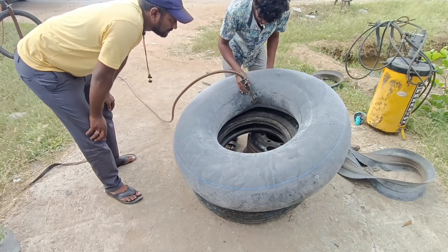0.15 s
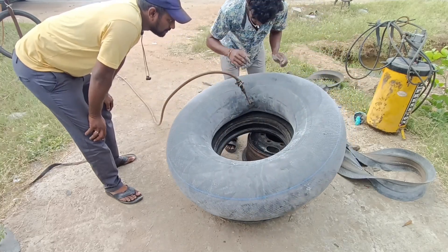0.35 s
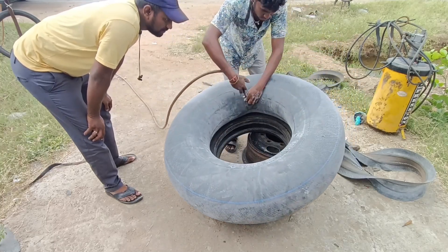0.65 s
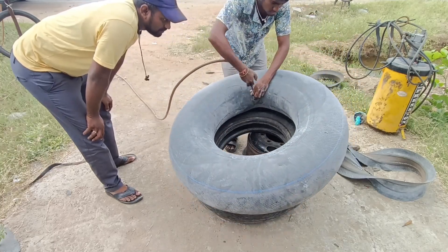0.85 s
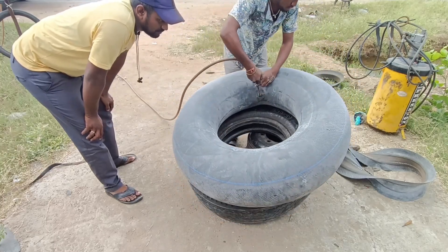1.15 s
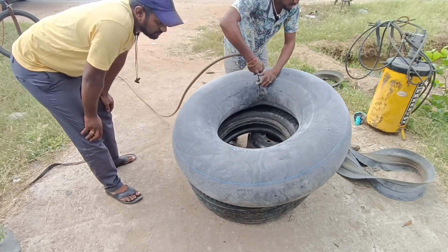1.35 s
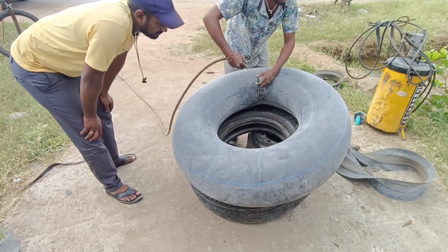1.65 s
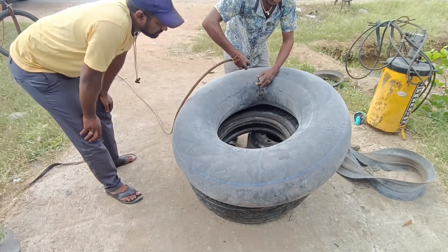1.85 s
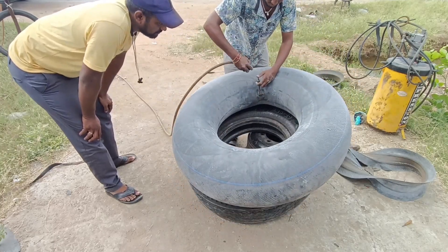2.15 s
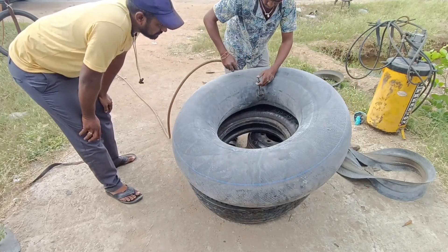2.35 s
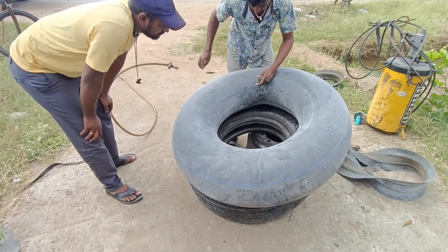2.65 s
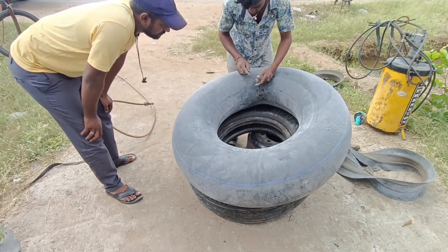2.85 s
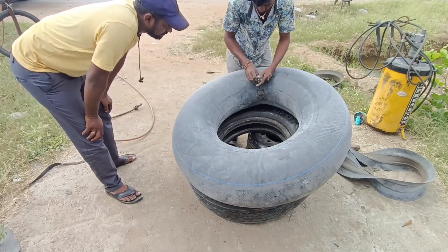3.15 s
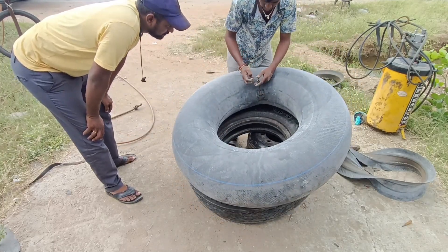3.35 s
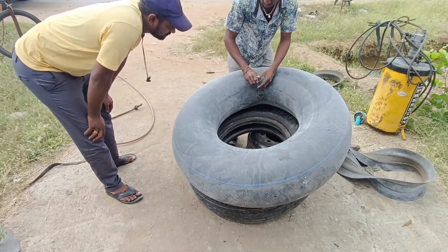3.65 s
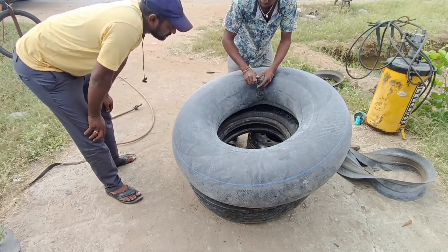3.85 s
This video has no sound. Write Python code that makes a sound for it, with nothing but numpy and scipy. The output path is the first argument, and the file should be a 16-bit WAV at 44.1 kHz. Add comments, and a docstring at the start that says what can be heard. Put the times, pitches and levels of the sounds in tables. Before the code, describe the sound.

Loud compressed air hisses from a tyre tube valve, bright and steady with faint brief whistles, over low road rumble. Light puffs come near 1.4 seconds; at 1.6 a heavy gust buffets the stereo microphone, then uneven hissing continues until it shuts off at 2.1 with a short outdoor echo. Near-quiet follows. At 3.2 a small steel part clinks and bounces faintly while a distant engine swells to the end.

```python
"""Air jet from a tyre valve, with passing engine and falling steel

Compressed air hisses, rushes and whistles from a hose chuck at a tyre tube valve: shaped, patchy noise.
The chuck is pulled off; the jet sweeps over two microphone ports as noise blasts and damped swings.
The valve then shuts and a brief yard echo fades. An engine, summed from harmonic orders, dips and then
swells over road noise and a steady motor; far squeaks and a constant faint hiss lie beneath.
A small steel part drops, clinks and bounces: decaying modes and noise at each contact."""
import sys
import numpy as np
from scipy import signal
from scipy.fft import rfft, irfft, next_fast_len
from scipy.io import wavfile
from scipy.ndimage import uniform_filter1d, map_coordinates

SR = 44100
rng = np.random.default_rng(int(sys.argv[2]) if len(sys.argv) > 2 else 0)


def generate_wav(sig):
    """Save sig (samples, or channels by samples) to the path in sys.argv[1] as 16-bit PCM at SR."""
    pcm = np.round(np.clip(np.atleast_2d(sig).T, -1, 1) * 32767).astype(np.int16)
    wavfile.write(sys.argv[1], SR, pcm)


N = 176400
T = np.arange(N) / SR

# Escaping air over time: time_s, hiss_db, left_minus_right_db, low_rush_db
JET_LEVELS = [(0, -31, -2, -40), (.14, -30.5, -2, -40), (.8, -30, -2, -41), (1.3, -30.5, -2.5, -40),
              (1.58, -29.5, -2.5, -41), (1.61, -22.5, 1, -31.5), (1.7, -28.5, -3, -29.5),
              (1.755, -33.5, -4.5, -41.5), (1.77, -30.5, -4.5, -46.5), (1.92, -28, -5, -45),
              (1.96, -27.5, -2.5, -45), (2.0, -27.5, -4.5, -44.5), (2.04, -31, -2.5, -43),
              (2.07, -28.5, -4, -39), (2.115, -33.5, -2.5, -46.5)]
# Spectral density of the jet above the edge: frequency_hz, density_db_per_hz
HISS_SPECTRUM = [(1530, -36), (2600, -6), (2800, -7.5), (3480, -4), (3770, -1), (4410, 0.5), (5470, -9),
                 (6590, -6.5), (7150, -9), (8810, -10), (11500, -18.5), (12900, -13.5), (13600, -13.5),
                 (14600, -21), (15400, -17)]
# Spectral density of the jet below the edge: frequency_hz, density_db_per_hz
RUSH_SPECTRUM = [(88, -41.5), (150, -5.5), (212, -12.5), (344, 0.5), (406, -2.5), (479, -3.5), (533, -14),
                 (622, -11.5), (837, -19), (1100, -6.5), (1190, -5.5), (1510, -10.5), (1770, -5),
                 (2240, -3), (2550, 0.5), (3320, -26.5), (5610, -120)]
# Likeness of the jet at the two ports: frequency_hz, correlation
JET_ALIKE = [(300, 1), (1400, 1), (2500, 1), (4000, 0.39), (8000, 0.069), (11000, .1)]
# Gain of the hiss above 9.5 kHz: time_s, gain_db
TREBLE_GAIN = [(0, -0.5), (1.55, 0.5), (1.62, -2.5), (1.72, 3), (1.8, 1.5), (1.95, .5), (2.03, 1.5),
               (2.115, 0.5)]
# Shift of the low rush to the left as the jet turns away: time_s, shift_db
RUSH_LEFT = [(1.75, 0), (1.78, 6.5), (2.1, 3.5)]
# Momentary whistles of the leak: middle_s, length_s (between points 3.4 dB down),
# pitch_hz, width_hz, level_db
WHISTLES = [(.07, 0.083, 4200, 60, -55), (.19, 0.062, 3720, 60, -37.5), (.36, 0.19, 3820, 50, -42),
            (.37, 0.1, 2420, 30, -42), (.47, .04, 2524, 28, -37.5), (.6, 0.09, 2500, 20, -54),
            (.45, 0.25, 4500, 50, -55), (.76, 0.1, 2458, 12, -42.5), (.92, 0.12, 2474, 24, -41.5),
            (.82, 0.21, 3940, 23, -38.5), (1.1, 0.15, 4450, 40, -41), (1.33, 0.091, 4520, 21, -38.5),
            (1.965, 0.043, 4584, 100, -31), (2.085, 0.067, 4876, 420, -37)]
EDGE_HZ = 2580  # a sharp edge in the spectrum; the sound above and below it is levelled separately
JET_LAG_S = 9e-5  # left port hears the jet later
SHUT_S, SHUT_T60_S = 2.119, 0.099  # closing of the valve
YARD_DB, YARD_T60_S = -12, 0.22  # the yard's echo of the jet
ECHOES, ECHO_SPAN_S, ECHO_DB = 6, .018, -13  # off tube, tyre and ground

# Road noise over time: time_s, level_db
ROAD_LEVELS = [(0, -48), (1.55, -42.5), (1.8, -46.5), (2.2, -58), (2.5, -57), (2.8, -56), (3.2, -49),
               (3.6, -47), (4, -44.5)]
# Spectral density of road noise: frequency_hz, density_db_per_hz
ROAD_SPECTRUM = [(25, -25.5), (60, -14), (110, -6.5), (150, -16), (232, -20.5), (372, -21.5), (540, -28.5),
                 (700, -32.5), (1000, -32), (1900, -38), (2450, -36.5), (2900, -44), (3700, -41),
                 (5700, -54), (10000, -63.5), (15400, -81)]
# Likeness of far sound at the two ports: frequency_hz, correlation
ROAD_ALIKE = [(60, 0.3), (400, 0.74), (1000, .6), (3000, 0.15), (8000, 0.27)]
# Engine over time: time_s, fourth_order_db, fifth_order_db, other_orders_db
ENGINE_LEVELS = [(0, -54, -65, -59.5), (1.5, -52.5, -60, -55), (1.8, -64, -64, -55), (2.2, -62, -60.5, -63),
                 (2.6, -62, -57, -77.5), (3, -55, -56.5, -62), (3.25, -49, -50.5, -60.5),
                 (3.5, -46.5, -45, -60.5), (3.7, -45, -39.5, -54.5), (3.85, -48, -37.5, -58.5),
                 (4, -46, -36.5, -54.5)]
# Other engine orders, relative to their common level: order, level_db
ENGINE_ORDERS = [(3, -3), (6, -10), (7, -5.5), (8, -3.5), (9, -5.5)]
# Steady motor over time: time_s, low_orders_db, order_16_db
MOTOR_LEVELS = [(0, -64, -71.5), (2.2, -78.5, -92.5), (2.6, -81, -80), (3, -72.5, -80.5), (3.3, -72, -85),
                (3.7, -64.5, -77.5), (4, -57, -75.5)]
# Motor orders, relative to those levels, order 16 first: order, level_db
MOTOR_ORDERS = [(16, 3.5), (5, -0.5), (6, 1.5), (7, -5.5), (8, -0.5), (11, -5.5)]
# Faint far squeaks: middle_s, length_s (between points 3.4 dB down), pitch_hz, width_hz, level_db
SQUEAKS = [(3.74, .08, 2070, 120, -70), (3.79, 0.055, 1990, 79, -67)]
ROAD_LAG_S = -3.5e-4  # negative: right port hears the road later
ENGINE_CYCLE_HZ, MOTOR_HZ = 20.0, 48.44  # rate of order 1

# Spectral density of the steady far hiss outdoors: frequency_hz, density_db_per_hz
AIR_SPECTRUM = [(1000, -31), (2000, -7.5), (2450, 1), (3000, -3.5), (5000, -11), (9000, -19),
                (15500, -32.5)]
AIR_LEVEL_DB = -80.5

# The jet blowing on the ports: start_s, hold_s, left_db, right_db, tilt_db_per_octave
BLASTS = [(1.384, 0.027, -41.5, -31, -13), (1.488, 0.041, -29.5, -48, -13), (1.598, 0.02, -41, -15.5, -4.5),
          (1.612, 0.043, -18.5, -16.5, -1.7), (1.657, 0.047, -20, -19, 0), (1.703, 0.018, -27.5, -22, 5.5),
          (1.721, 0.036, -33, -29.5, 5.5), (1.748, 0.004, -33, -24, 7.5),
          (1.754, 0.022, -39.5, -38.5, -8.5), (1.783, 0.022, -33.5, -53, 7),
          (1.836, 0.022, -38.5, -43, -3.5), (1.88, 0.014, -34, -44.5, 2.5), (1.929, 0.0077, -35, -33, 3.5),
          (2.053, 0.031, -63, -27, -4), (2.05, 0.0035, -52, -26.5, 3), (2.093, 0.025, -60, -41.5, -2)]
# Spectral density of that turbulence before tilt: frequency_hz, density_db_per_hz
PORT_SPECTRUM = [(25, -34.5), (60, -22), (110, -9.5), (286, -3), (543, -12.5), (712, -9.5), (1650, -14.5),
                 (2900, -16), (3800, -13), (5500, -29.5), (9000, -39.5), (12000, -62)]
BLAST_RISE_S, BLAST_T60_S = 0.003, 0.057

# Single pushes of air on the ports: start_s, pitch_hz, left_db, right_db
THUMPS = [(1.602, 130, -24.5, -9.5), (1.615, 253, -16, -13.5), (1.635, 218, -13.5, -13.5),
          (1.674, 260, -18, -17), (1.695, 245, -19, -20), (1.905, 129.6, -29.5, -41.5),
          (1.934, 140.7, -23.5, -35.5), (2.059, 150, -43, -13.5), (2.071, 231, -45, -17),
          (2.094, 130, -47, -24.5)]
THUMP_CYCLES = 3.5  # cycles to lose 30 dB

# Contacts of the steel part: start_s, level_db, thud_db (relative), thud_tilt_db_per_octave
CLINKS = [(3.1936, -36, -2, 1), (3.212, -56, 8.5, -3.5), (3.224, -51, -16, 0), (3.277, -60, -25, -2),
          (3.366, -66.5, -16, -2), (3.394, -71, -20, 5)]
# Modes of the steel part: frequency_hz, level_db, t60_s
STEEL_MODES = [(8742, -16, .035), (9913, -3, .26), (9960, -10, .22), (10570, -14, .04), (12730, -18, .025)]
# Modes of what it lands on: frequency_hz, level_db, t60_s
THUD_MODES = [(290, -1, 0.038), (490, -6, 0.022), (880, 3, 0.04), (1000, 2, 0.032), (1600, 7, 0.018),
              (1790, 3, 0.018), (3020, -1, .015), (3900, 0, .035), (4800, -5, 0.025)]
# Spectral density of crack and scatter: frequency_hz, density_db_per_hz
SCATTER_SPECTRUM = [(300, -29), (1000, -4), (4000, 1.5), (7000, -17.5), (10000, 12), (13000, -17),
                    (15500, -13)]
CLINK_LAG = 6  # samples by which the right port hears it later

LOW_CUT_HZ, TOP_HZ = 36, 15547  # limits of the microphone band


def amp(db):
    """Logarithmic level: decibels to amplitude gain."""
    return 10 ** (np.asarray(db) / 20)


def unit(x):
    """Normalization: scale to an rms of 1."""
    return x / np.sqrt(np.mean(x ** 2) + 1e-20)


def along(points, hz):
    """Logarithmic pitch scale: interpolate (frequency, value) points along it."""
    f, v = np.transpose(points)
    return np.interp(np.log(hz + 1), np.log(f + 1), v)


def curves(rows):
    """Slow modulation: one value per sample for each column after the time."""
    s, *columns = np.transpose(rows)
    return [np.interp(T, s, column) for column in columns]


def wobble(rate):
    """Random modulation: a smooth curve through rate random knots a second."""
    knots = rng.standard_normal(int(N * rate / SR) + 4)
    return map_coordinates(knots, [T * rate])


def filtered(x, response):
    """Linear filtering: multiply the spectrum by a response of frequency."""
    m = next_fast_len(x.shape[-1] + 8192)
    hz = np.fft.rfftfreq(m, 1 / SR)
    return irfft(rfft(x, m) * response(hz), m)[..., :x.shape[-1]]


def balance(left_minus_right_db):
    """Interaural-style level difference: gains of the left and right ports."""
    return amp(np.outer([.5, -.5], left_minus_right_db))


def patchy_noise(spectrum, alike, patchy_db, lag_s=0):
    """Partly coherent turbulence: stereo noise of rms 1 with narrow streaks of random gain."""
    z = signal.stft(rng.standard_normal((2, N)), nperseg=1024)[2]
    field = uniform_filter1d(rng.standard_normal(z.shape[1:]), size=2, axis=0)
    field = uniform_filter1d(field, size=10, axis=1)
    pair = signal.istft(z * amp(patchy_db * unit(field)), nperseg=1024)[1][:, :N]

    def mid_side(hz):
        # half the angle whose cosine is the left-right correlation
        turn = np.arccos(np.clip(along(alike, hz), -1, 1)) / 2
        return amp(along(spectrum, hz)) * [np.cos(turn), np.sin(turn)]

    mid, side = filtered(pair, mid_side)
    ports = np.array([mid + side, mid - side])
    # half the lag on each port, in opposite directions
    return unit(filtered(ports, lambda hz: np.exp(np.outer([-1j, 1j], np.pi * hz * lag_s))))


def early_echoes(x):
    """Comb filtering: weak early copies, different at each port, interfere with the direct sound."""
    lag_s = rng.uniform(.002, ECHO_SPAN_S, (2, ECHOES, 1))
    sign = rng.choice([-1, 1], (2, ECHOES, 1))

    def comb(hz):
        copies = (sign * np.exp(-2j * np.pi * hz * lag_s)).sum(axis=1)
        return (1 + amp(ECHO_DB) * copies) / np.sqrt(1 + ECHOES * amp(2 * ECHO_DB))

    return filtered(x, comb)


def valve():
    """Exponential decay: the jet is shut off, then the weaker, slower yard echo remains."""
    after = np.maximum(T - SHUT_S, 0)
    return np.maximum(amp(-60 * after / SHUT_T60_S), amp(YARD_DB - 60 * after / YARD_T60_S))


def jet():
    """Jet turbulence: broadband hiss and low rush, joined by whistles and cut by the valve."""
    hiss_db, pan_db, low_db = curves(JET_LEVELS)
    treble_db, = curves(TREBLE_GAIN)
    left_db, = curves(RUSH_LEFT)

    hiss = patchy_noise(HISS_SPECTRUM, JET_ALIKE, patchy_db=1.8, lag_s=JET_LAG_S)
    hiss = filtered(hiss, lambda hz: hz >= EDGE_HZ)
    treble = filtered(hiss, lambda hz: hz > 9500)
    hiss = hiss + (amp(treble_db) - 1) * treble

    low = patchy_noise(RUSH_SPECTRUM, JET_ALIKE, patchy_db=3.5, lag_s=JET_LAG_S)
    low = filtered(low, lambda hz: hz < EDGE_HZ) * balance(left_db)

    hiss = amp(hiss_db + 0.72 * wobble(13.27)) * hiss
    low = amp(low_db + 0.37 * wobble(13)) * low
    air = early_echoes(hiss + low) + whistles(WHISTLES)
    return air * valve() * balance(pan_db)


def whistles(rows):
    """Narrow-band noise: each random tone swells and fades under half a cosine."""
    out = np.zeros((2, N))
    for middle_s, length_s, pitch_hz, width_hz, db in rows:
        shared, left, right = rng.standard_normal((3, N))
        ports = np.array([shared + 1.4 * left, shared + 0.61 * right])
        band = unit(filtered(ports, lambda hz: np.exp(-((hz - pitch_hz) / width_hz) ** 2)))
        swell = np.cos(np.pi * np.clip((T - middle_s) / length_s / 1.9, -.5, .5))
        out += amp(db) * swell * band
    return out


def road():
    """Rolling noise: broadband sound of slowly changing level, partly coherent at the ports."""
    level_db, = curves(ROAD_LEVELS)
    noise = patchy_noise(ROAD_SPECTRUM, ROAD_ALIKE, patchy_db=-0.5, lag_s=ROAD_LAG_S)
    return amp(level_db) * amp(0.94 * wobble(13)) * noise


def orders(rate_hz, rows, unsteady_db):
    """Rotational harmonics: sines at multiples of an unsteady rate, each wavering in level."""
    turns = 2 * np.pi * np.cumsum(rate_hz * (1 + .005 * wobble(9))) / SR
    tones = []
    for order, db in rows:
        level = np.sqrt(2) * amp(db + unsteady_db * wobble(14))
        tones.append(level * np.sin(round(order) * turns + rng.uniform(0, 2 * np.pi)))
    return tones


def engine():
    """Harmonic drone: orders of the engine cycle, with the fourth and fifth swelling separately."""
    fourth_db, fifth_db, rest_db = curves(ENGINE_LEVELS)
    rows = [(4, 0.019), (5, 0.002)] + ENGINE_ORDERS
    fourth, fifth, *rest = orders(ENGINE_CYCLE_HZ, rows, unsteady_db=-0.34)
    drone = amp(fourth_db) * fourth + amp(fifth_db) * fifth + amp(rest_db) * sum(rest)
    return drone * amp([[-.2], [.2]])


def motor():
    """Rotational harmonics at a steady mean rate: low orders and order 16 vary separately in level."""
    low_db, high_db = curves(MOTOR_LEVELS)
    high, *low = orders(MOTOR_HZ, MOTOR_ORDERS, unsteady_db=4)
    return amp(low_db) * sum(low) + amp(high_db) * high


def far_air():
    """Stationary noise: a faint outdoor hiss of constant level."""
    return amp(AIR_LEVEL_DB) * patchy_noise(AIR_SPECTRUM, ROAD_ALIKE, patchy_db=1.2)


def blasts():
    """Local flow noise: lumpy turbulence, unrelated at the two ports, when the jet points at them."""
    out, n = np.zeros((2, N)), SR // 4
    t = T[:n]
    for start_s, hold_s, left_db, right_db, tilt_db in BLASTS:
        knots = rng.standard_normal((2, 64))
        lumps = amp(3.6 * map_coordinates(knots, [[[0] * n, [1] * n], [t * 170] * 2]))

        def tilted(hz):
            return amp(along(PORT_SPECTRUM, hz) + tilt_db * np.log2((hz + 20) / 250))

        noise = unit(filtered(rng.standard_normal((2, n)), tilted)) * lumps
        shape = np.minimum(t / BLAST_RISE_S, 1) * amp(-60 * np.maximum(t - hold_s, 0) / BLAST_T60_S)
        burst = shape * noise
        # equal energy at each port before its level is set
        burst *= np.linalg.norm(shape) / np.linalg.norm(burst, axis=1, keepdims=True)
        start = round(start_s * SR)
        out[:, start:start + n] += amp([[left_db], [right_db]]) * burst
    return out


def thumps():
    """Damped oscillation: each push swings the air in the port for a few cycles."""
    out, t = np.zeros((2, N)), T[:SR // 8]
    for start_s, pitch_hz, left_db, right_db in THUMPS:
        rise = np.minimum(t * pitch_hz * 2, 1)
        decay = amp(-30 * t * pitch_hz / THUMP_CYCLES)
        swing = np.sin(2 * np.pi * pitch_hz * t) * rise * decay * rng.choice([-1, 1])
        out[:, round(start_s * SR):][:, :len(t)] += amp([[left_db], [right_db]]) * swing
    return out


def ring(modes, t, tilt_db=0):
    """Modal vibration: sum decaying sines whose levels vary at random from contact to contact."""
    total = np.zeros(len(t))
    for hz, level_db, t60_s in modes:
        struck_db = level_db + tilt_db * np.log2(hz / 900) + rng.normal(0, 1.2)
        total += amp(struck_db - 60 * t / t60_s) * np.sin(2 * np.pi * hz * t)
    return total


def clink():
    """Impact excitation: each contact cracks, rings the part, thuds on the ground and scatters."""
    out, t = np.zeros((2, N)), T[:SR // 2]
    for start_s, db, thud_db, tilt_db in CLINKS:
        noise = rng.standard_normal((3, len(t)))
        noise = unit(filtered(noise, lambda hz: amp(along(SCATTER_SPECTRUM, hz))))
        crack = amp(12.0 - 60 * t / 0.01) * noise[0]
        scatter = amp(-0.5 - 60 * t / 0.078) * noise[1:]  # separate noise at each port
        thud = amp(thud_db) * ring(THUD_MODES, t, tilt_db)
        contact = ring(STEEL_MODES, t) + thud + crack + scatter
        rise = np.minimum(t / 0.0013, 1)
        out[:, round(start_s * SR):][:, :len(t)] += amp(db) * rise * contact
    return np.array([out[0], np.roll(out[1], CLINK_LAG)]) * amp([[-.6], [.6]])


def scene():
    """Superposition: all source pressures add at the two ports."""
    traffic = road() + engine() + motor() + whistles(SQUEAKS)
    return jet() + traffic + far_air() + blasts() + thumps() + clink()


def record(dry):
    """Band limitation: the microphone loses the deepest bass and everything above its top limit."""
    def response(hz):
        top = np.clip((TOP_HZ - hz) / 80, 0, 1) ** 2
        return top / (1 + (LOW_CUT_HZ / (hz + 1)) ** 3)

    return filtered(dry, response)


dry = scene()
out = record(dry)
generate_wav(out)
```